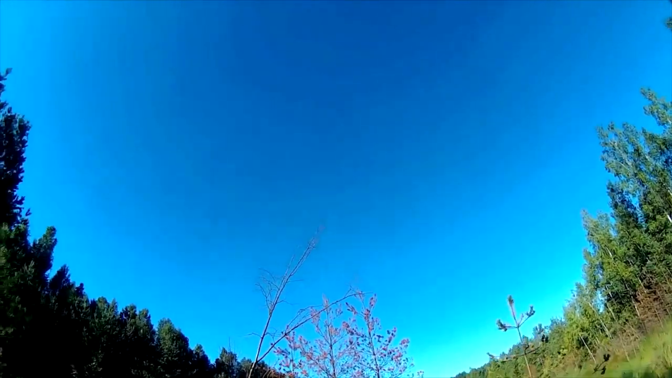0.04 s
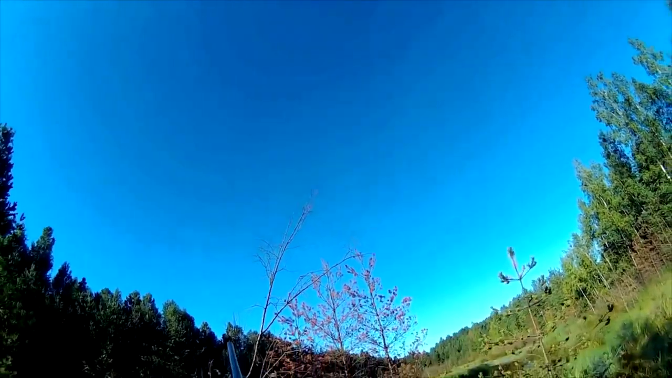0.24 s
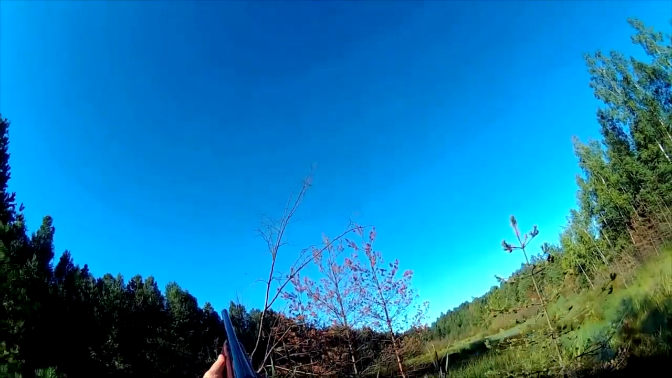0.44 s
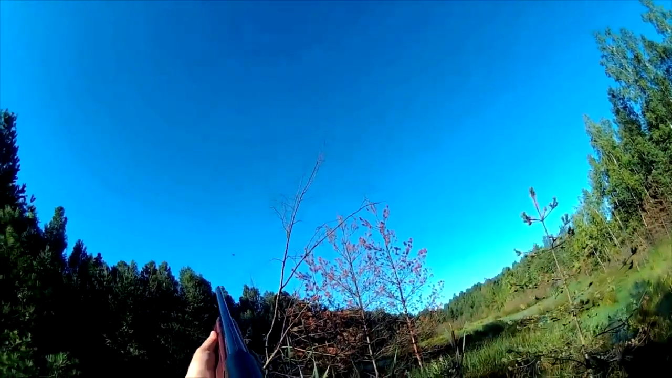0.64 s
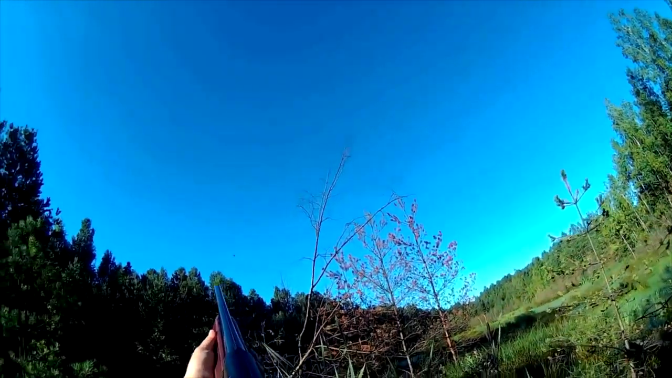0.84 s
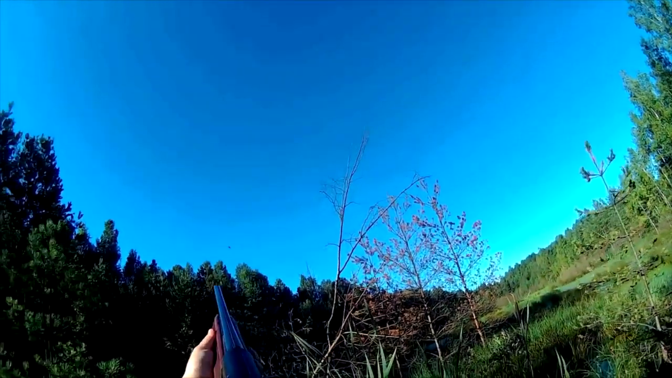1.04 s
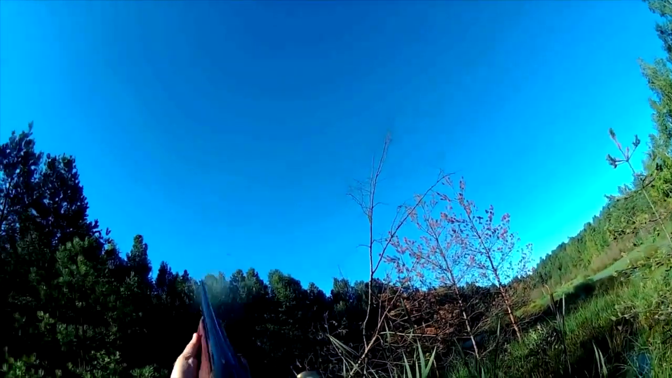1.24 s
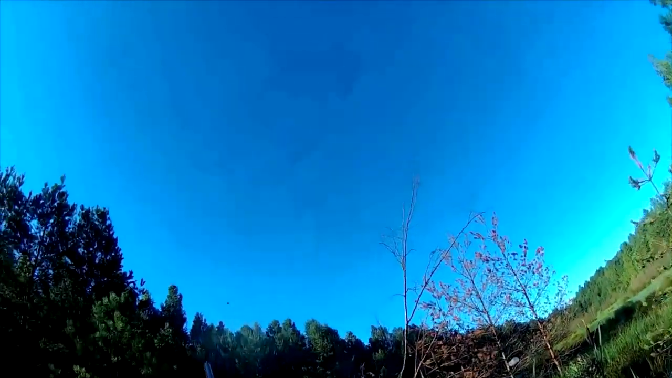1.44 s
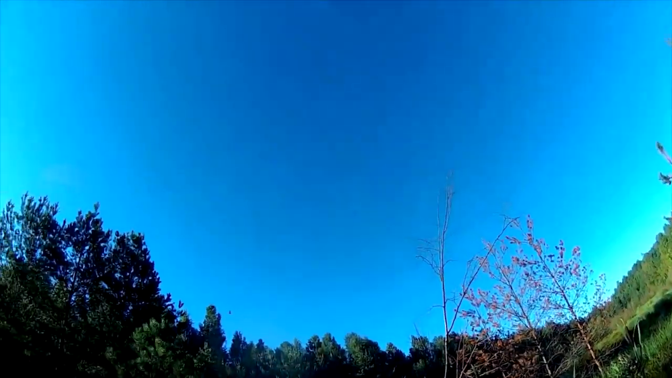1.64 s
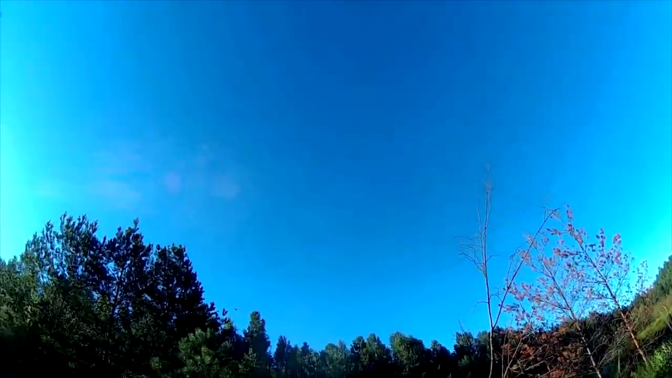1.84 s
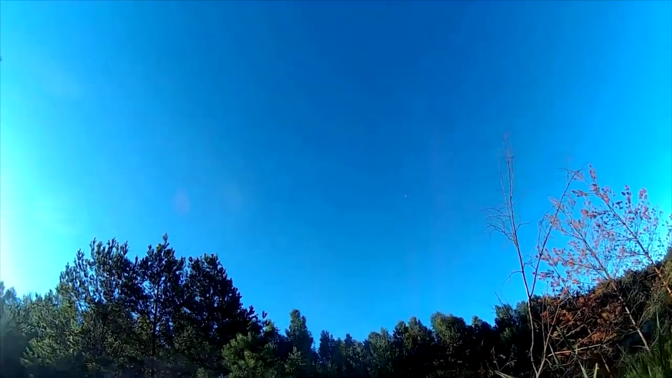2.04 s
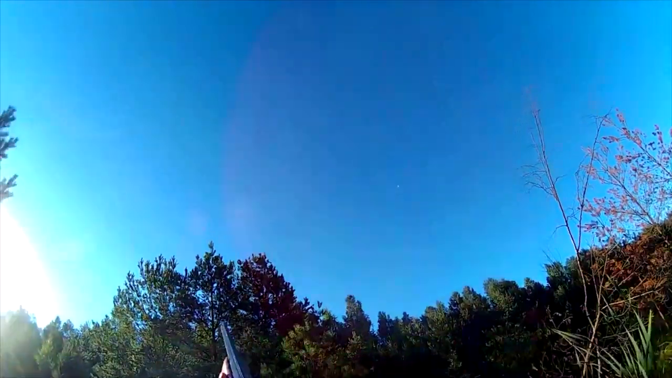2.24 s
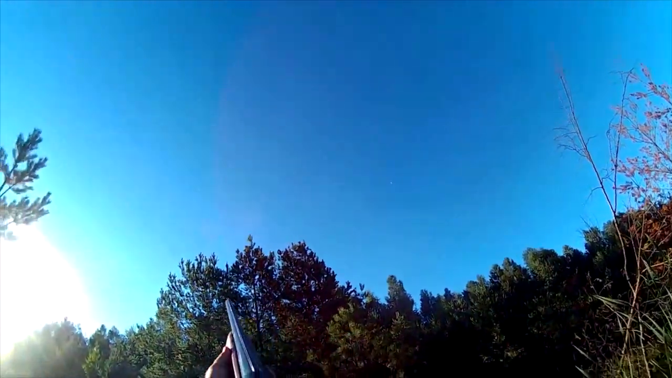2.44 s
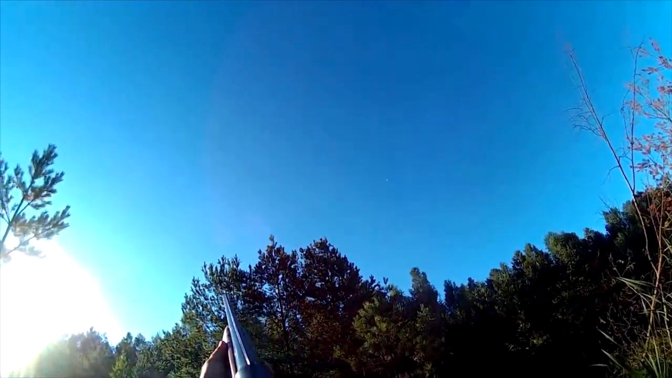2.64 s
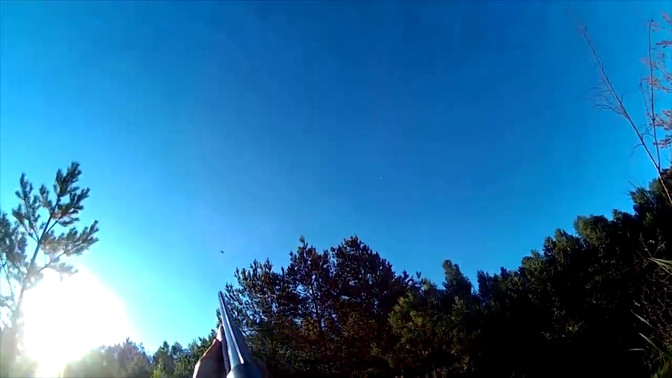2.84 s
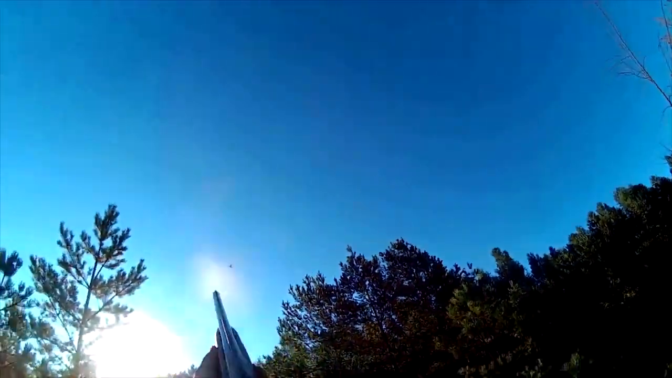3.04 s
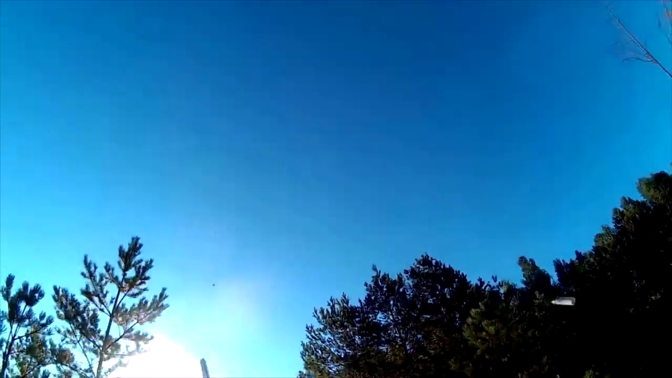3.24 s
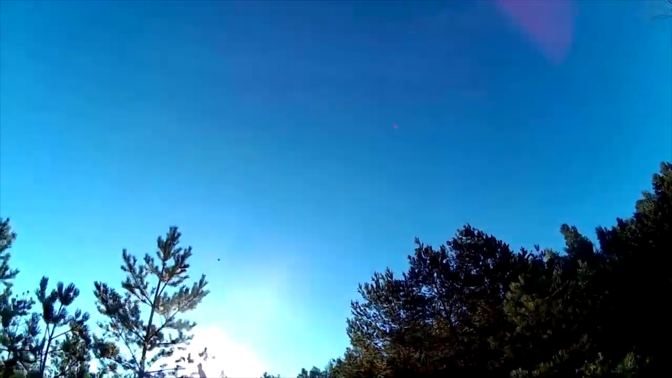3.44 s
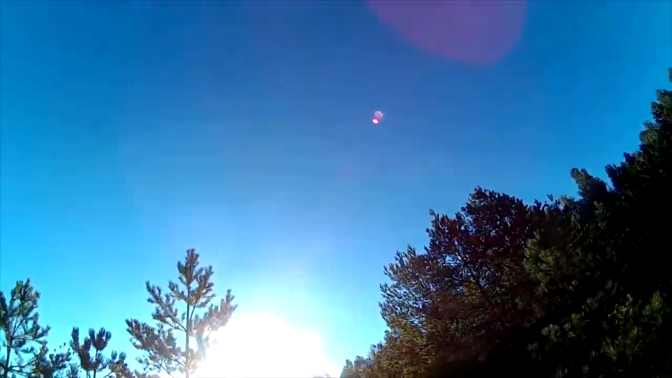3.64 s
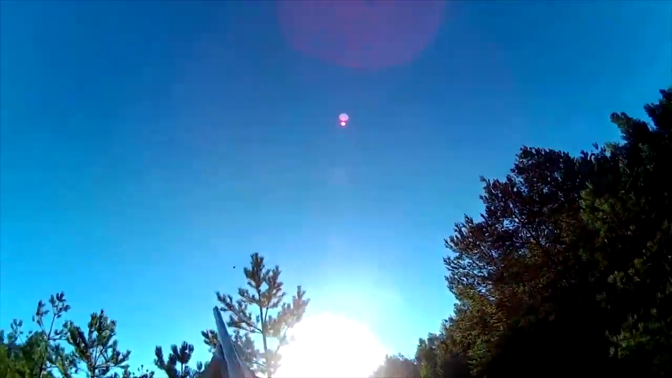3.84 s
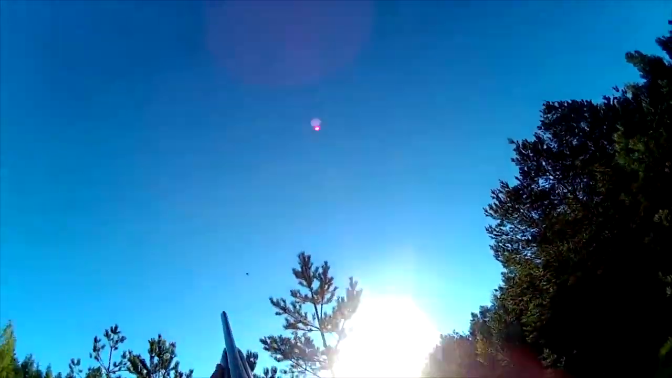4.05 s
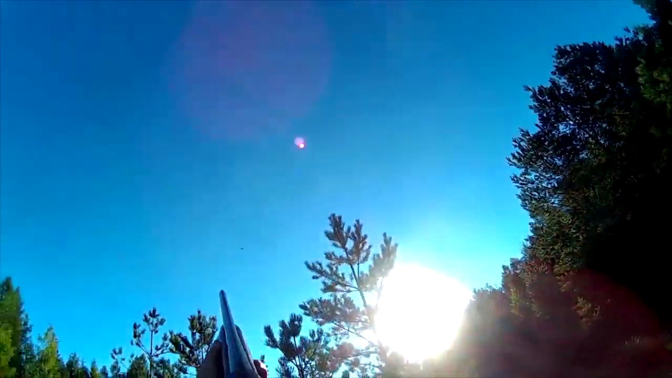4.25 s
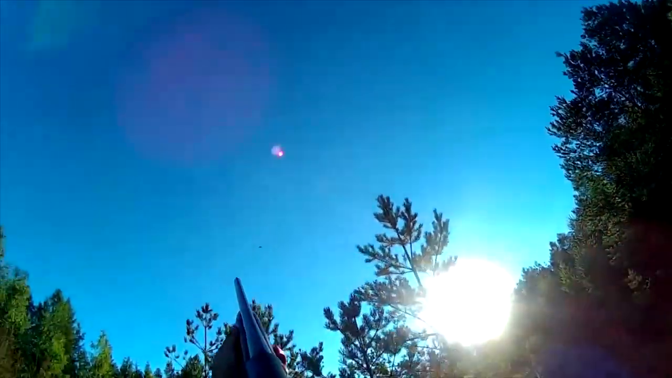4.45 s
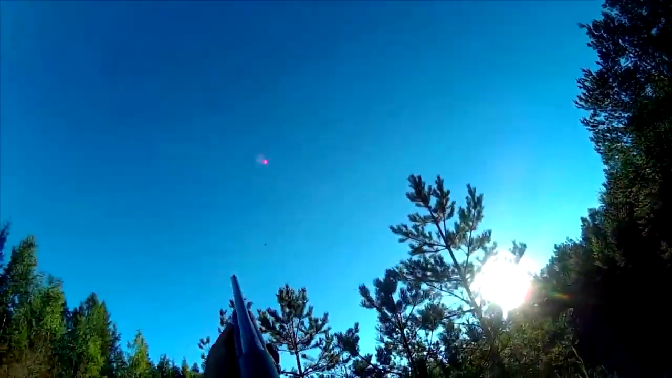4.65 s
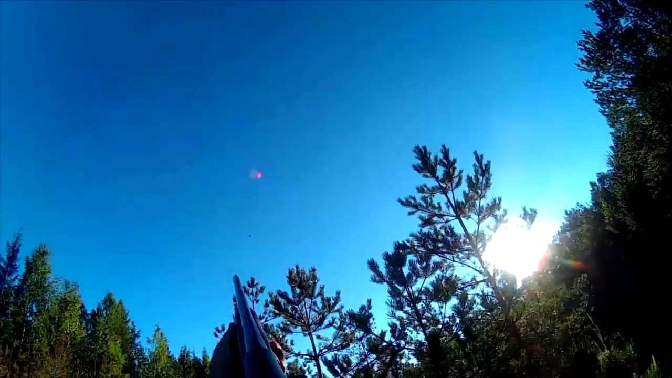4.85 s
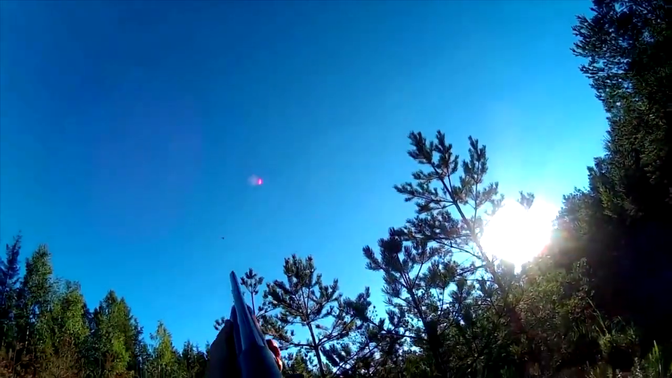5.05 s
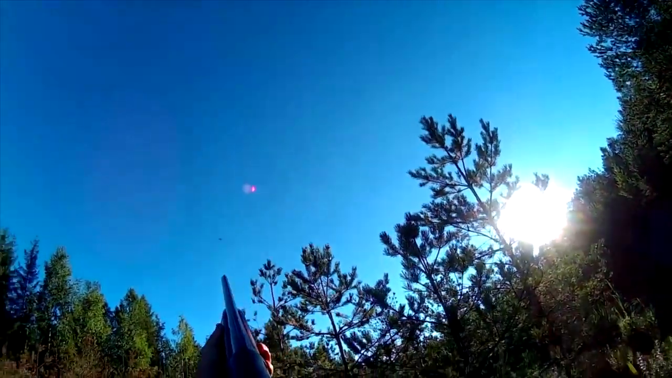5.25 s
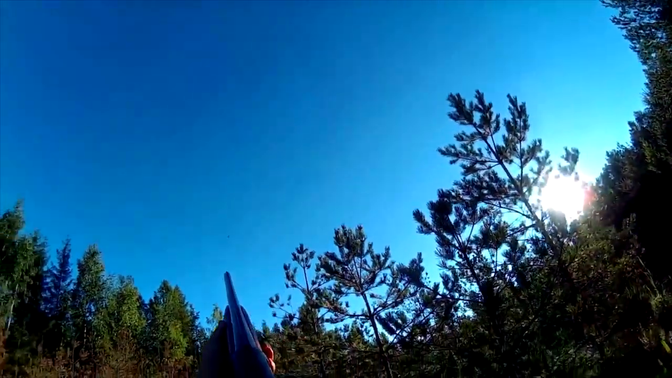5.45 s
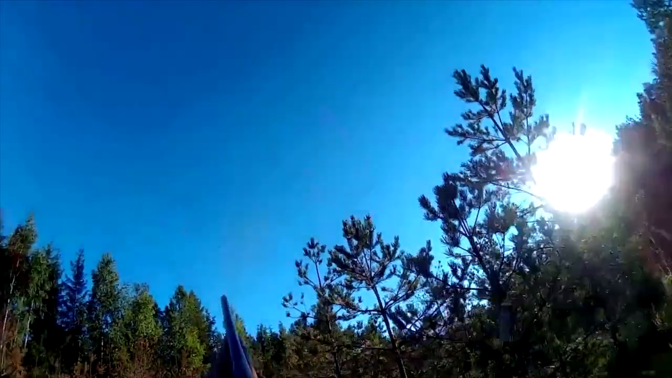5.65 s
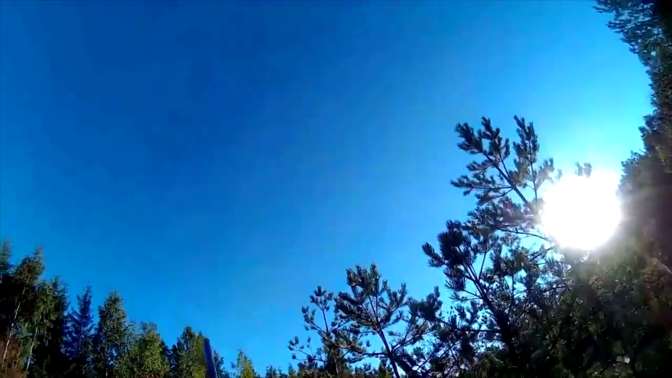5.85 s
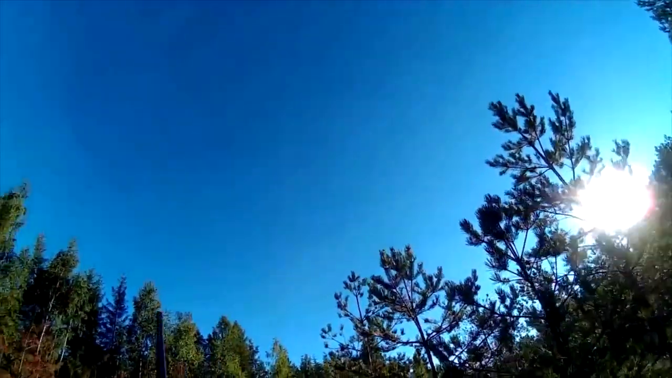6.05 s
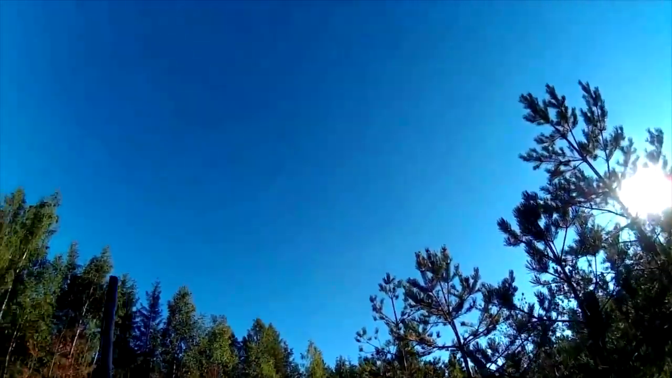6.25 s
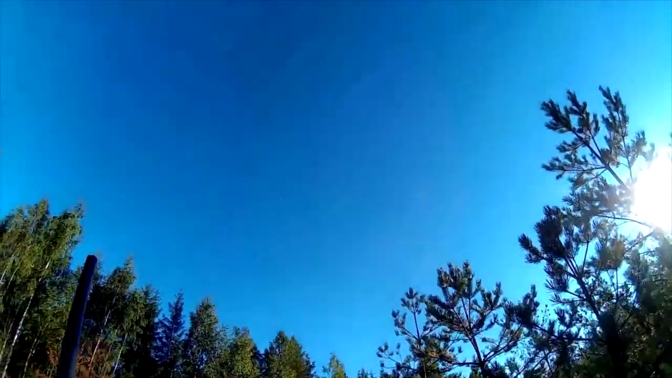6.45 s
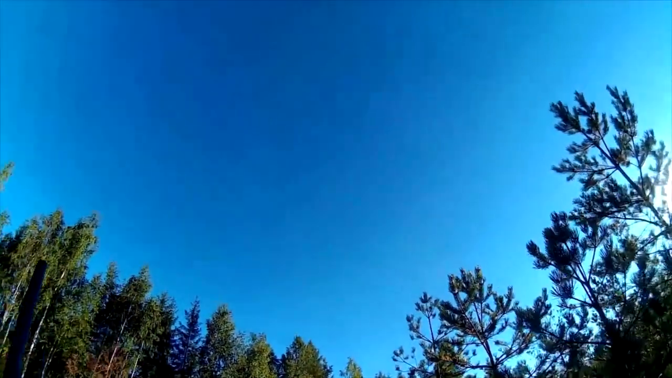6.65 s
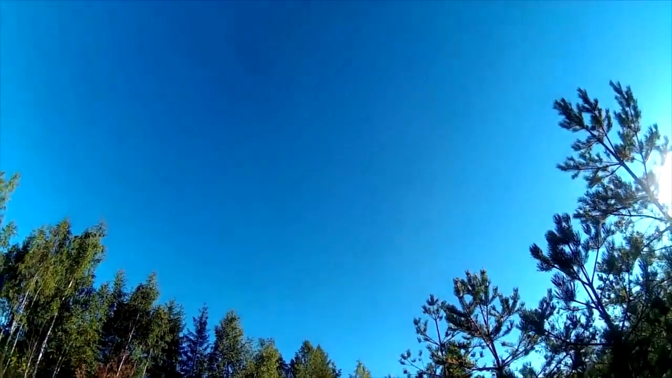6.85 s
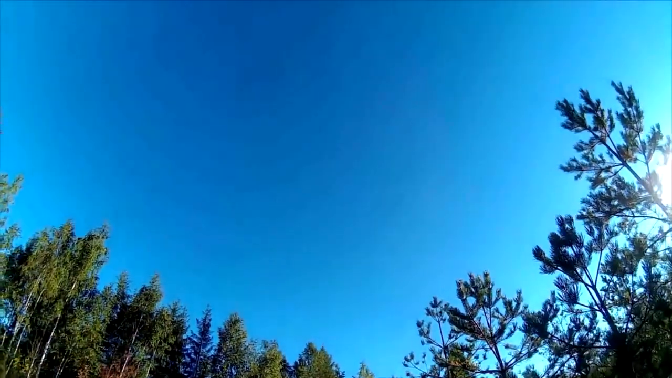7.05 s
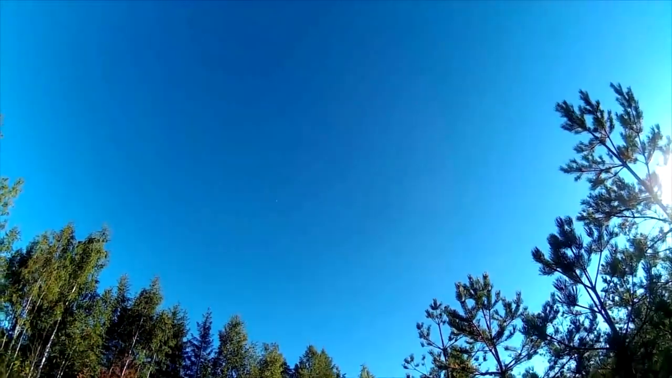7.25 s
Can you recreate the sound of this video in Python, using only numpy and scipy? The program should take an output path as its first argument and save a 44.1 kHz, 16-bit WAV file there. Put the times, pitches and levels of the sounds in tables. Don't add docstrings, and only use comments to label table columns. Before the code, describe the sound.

After wooden gun knocks and scraping cloth, three close shotgun shots distort the microphone, their long dull echoes rumbling back from surrounding trees.

```python
import sys
import numpy as np
from scipy import signal
from scipy.fft import rfft, irfft, next_fast_len
from scipy.io import wavfile

SR = 44100
rng = np.random.default_rng(int(sys.argv[2]) if len(sys.argv) > 2 else 0)


def dump_mix(stems):
    frames = np.atleast_2d(stems).T
    limited = np.clip(frames, -1, 1)
    pcm = np.round(limited * 32767).astype(np.int16)
    wavfile.write(sys.argv[1], SR, pcm)


def undo_db(level):
    steps = np.asarray(level, float) / 20
    return 10 ** steps


N = 322341
PADDED = next_fast_len(N)
HZ = np.maximum(np.fft.rfftfreq(PADDED, 1 / SR), 1)
FULL = .96

# start in seconds, muzzle ring in dB, near echo in dB, its fading in dB per second,
# far echo in dB.
SHOTS = [
    (1.5393, -8, 12.5, 46, -7),
    (3.3469, -6.5, 7.5, 41.5, -9.5),
    (5.8783, -11, 9.5, 44, -8),
]
# frequency in Hz, gain in dB.
OUTPUT_TONE = [(15, -13), (60, -5), (200, 1.05), (1500, 1), (3000, -2), (5000, -6.5), (6400, -14.5),
               (7000, -21), (7150, -43), (7550, -39.5), (7700, -21), (8700, -13), (8800, -13)]


def rms_one(x):
    return x / np.sqrt(np.mean(x ** 2) + 1e-20)


def at_hz(points, hz):
    table_hz, table_db = np.array(points).T
    return np.interp(np.log(hz), np.log(table_hz), table_db)


def drift(rate):
    pole = np.exp(-80 * np.pi * rate / SR)
    white = rng.standard_normal(N // 40 + 2002)
    slow = signal.lfilter([1], [1, -2 * pole, pole * pole], white)[2000:]
    return np.interp(np.arange(N) / 40, np.arange(len(slow)), rms_one(slow))


def coloured(white, spectrum):
    gain = undo_db(at_hz(spectrum, HZ) - at_hz(OUTPUT_TONE, np.minimum(HZ, 6500)))
    return rms_one(irfft(rfft(white, PADDED) * gain, PADDED)[:N])


def slices(noise, gain_db):
    spectrum = rfft(noise, PADDED)
    place = 3 * np.clip(np.log2(HZ / 60), 0, 7)
    total = 0
    for k in range(22):
        band = irfft(spectrum * np.clip(1 - abs(place - k), 0, 1), PADDED)[:N]
        total = total + band * undo_db(gain_db(60 * 2 ** (k / 3)))
    return total


def strokes(rows):
    t, power = np.arange(0, N + 50, 50) / SR, 1e-10
    for s, db, rise, fall in rows:
        spans_away = np.where(t < s, (s - t) / rise, (t - s) / fall)
        power = power + undo_db(2 * db - 40 * spans_away)
    return np.interp(np.arange(N) / SR, t, 10 * np.log10(power))


def add_ring(out, s, db, hz, t60, rise_cycles=.5):
    t = np.arange(round(.08 * SR)) / SR
    part = out[round(s * SR):][:len(t)]
    rise = 1 - np.exp(-(hz * t / rise_cycles) ** 2)
    decay = undo_db(db - 60 * t / max(t60, .001))
    part += (rise * decay * np.sin(2 * np.pi * hz * t))[:len(part)]


def quiet_air():
    # frequency in Hz, density in dB per Hz.
    air_tone = [(18, -45.5), (30, -24), (87, -2.5), (131, -7.5), (271, -8), (467, -4.5), (988, -5.5),
                (1520, -14.5), (6800, -40.5), (8840, -67.5), (15000, -120)]
    return undo_db(-52.5) * coloured(rng.standard_normal(N), air_tone)


def knocks_and_ticks():
    # start in seconds, peak in dB, pitch in Hz, decay t60 in seconds.
    knocks = [(0.074, -31, 649, 0.02), (0.089, -12.5, 1200, 0.018), (0.098, -26, 1410, 0.03),
              (0.164, -27, 1220, 0.021), (0.243, -32, 765, 0.027), (0.251, -9.5, 890, 0.016),
              (0.268, -23, 1260, 0.023), (0.722, -18, 1066, 0.036), (0.782, -11, 557, 0.022),
              (0.793, -15.5, 630, 0.036), (0.815, -15, 1030, 0.009), (0.844, -35, 624, 0.018),
              (0.875, -28, 1610, 0.026), (1.018, -47, 624, 0.02), (1.144, -12, 1140, 0.012),
              (1.476, -37, 720, 0.014), (4.737, -11.5, 827, 0.02), (4.671, -19.5, 1670, 0.036),
              (7.246, -21, 900, 0.023)]
    # start in seconds, peak in dB, pitch in Hz, decay t60 in seconds, duller ring in relative dB.
    tick_rows = [(4.4356, -32.5, 2740, 0.034, 19), (4.621, -30, 2820, 0.03, -5),
                 (4.679, -25, 3530, 0.025, 8), (4.7351, -32, 2930, 0.025, -8),
                 (4.8582, -20.5, 4080, 0.015, 9), (4.9394, -59, 2940, 0.025, 1),
                 (5.0922, -29.5, 3640, 0.025, -12), (5.135, -41, 2630, 0.011, -7),
                 (5.269, -42, 3360, 0.032, 16), (5.295, -39.5, 2790, 0.024, 14),
                 (5.3714, -40, 3800, 0.028, -7), (5.3896, -56, 2680, 0.025, 3),
                 (7.2465, -50, 2700, 0.025, 24)]
    # start in seconds, level in dB, pitch in Hz, decay t60 in seconds.
    thumps = [
        (0.25, -25, 383, 0.016),
        (0.704, -26.5, 506, 0.066),
        (0.784, -38, 470, 0.043),
        (4.856, -25, 463, 0.06),
        (6.877, -25, 206, 0.071),
        (6.959, -24, 307, 0.09),
    ]
    out = np.zeros(N)
    soft = 0.84
    detune = rng.uniform(0.847, 1.11, (len(knocks), 2))
    for (s, db, hz, t60), (low, high) in zip(knocks, detune):
        add_ring(out, s, db - 3.5, hz, t60, soft)
        add_ring(out, s, db - 13, 0.81 * low * hz, 0.91 * t60, soft)
        add_ring(out, s, db - 4.5, 1.3 * high * hz, .5 * t60, soft)
        add_ring(out, s, db - 7.5, 1.166 * low * hz, 0.67 * t60, soft)
        add_ring(out, s + 0.00198, db - 10.5, 0.83 * high * hz, t60, soft)
    ratios = rng.uniform(.85, 1.15, (len(tick_rows), 4))
    for (s, db, hz, t60, dull_db), spread in zip(tick_rows, ratios):
        add_ring(out, s, db - 1.5, hz, 0.88 * t60, 1.5)
        add_ring(out, s, db + dull_db, 1450, .018)
        for ratio in spread:
            add_ring(out, s, db - 8, ratio * hz, .01, 1.5)
    for s, db, hz, t60 in thumps:
        add_ring(out, s, db + 1, hz, t60)
    return out


def grains(per_s, clump_db):
    sizes = undo_db(2.2 * np.minimum(rng.exponential(1, N), 5)) * rng.standard_normal(N)
    chance = per_s * undo_db(clump_db * drift(20)) / SR
    return sizes * (rng.random(N) < chance)


def jacket():
    # peak in seconds, level in dB, rise in seconds, fall in seconds, brightness in dB.
    jacket_strokes = [
        (.2, -50, .5, 0.59, -22.5),
        (.43, -48.5, 0.14, 0.32, -15.5),
        (.57, -34, 0.14, 0.12, -21),
        (.66, -33.5, .15, 0.18, -15.5),
        (.83, -30, 0.16, 0.14, -15.5),
        (.93, -52, .1, 0.3, -2.5),
        (1.07, -44, 0.22, 0.059, -13),
        (1.2, -53, 0.25, 0.18, -12.5),
    ]
    # frequency in Hz, density in dB per Hz.
    cloth_tone = [(80, -44.5), (150, -25), (250, -10.5), (450, -7), (600, -4), (1070, -5), (2000, -5.5),
                  (3300, -14.5), (3770, -11), (4400, -24.5), (5700, -32), (6600, -48), (8800, -42)]
    low_db = strokes([row[:4] for row in jacket_strokes])
    high_db = strokes([(s, db + bright_db, rise, fall) for s, db, rise, fall, bright_db in jacket_strokes])
    hollow_hz = 900 * 2 ** (0.31 * drift(6.7))

    def gain_db(hz):
        bright = np.clip(np.log2(hz / 1500), 0, 1)
        peak_db = 8 * np.exp(-(np.log2(hz / hollow_hz) / .35) ** 2)
        return low_db + bright * (high_db + 12.5 - low_db) + peak_db + 1.8 * drift(15)

    return slices(coloured(grains(per_s=4500., clump_db=2.5), cloth_tone), gain_db)


def gun():
    # start in seconds, level in dB, pitch in Hz, decay t60 in seconds.
    hammer = [
        (1.517, -24, 2230, 0.0051),
        (3.323, -28.5, 2230, 0.0089),
        (5.856, -28.5, 2210, 0.006),
    ]
    out = np.zeros(N)
    for s, db, hz, t60 in hammer:
        add_ring(out, s, db - 4, hz, t60)
        add_ring(out, s, db - 10, 3400, .01)
        add_ring(out, s, db - 8, 1300, .015)
    for s, ring_db, *_ in SHOTS:
        add_ring(out, s - .0045, -23, 1050, .04)
        add_ring(out, s - .004, -33, 350, .02)
        add_ring(out, s - .0035, -42, 3300, .01)
        add_ring(out, s - .003, -30, 1700, .03)
        add_ring(out, s - .0002, ring_db, 2350, .04)
        add_ring(out, s, ring_db - 4, 3300, .03)
        add_ring(out, s, ring_db - 3, 850, .03)
    return out


def roll():
    # peak in seconds, level in dB, rise and fall in seconds.
    ridges = [
        (2.07, -9.5, 0.23, 0.34),
        (3.8, -17.5, 0.22, .3),
        (4.58, -34, 0.38, 0.11),
        (4.84, -30.5, .5, .05),
        (6.42, -17, 0.31, 0.074),
        (6.63, -22.5, 0.13, .3),
        (6.97, -20.5, 0.21, 0.067),
        (7.27, -31.5, 0.36, .3),
    ]
    t, power = np.arange(N) / SR, 1e-18
    hold_s = .05
    for s, _, near_db, near_db_per_s, far_db in SHOTS:
        age = np.maximum(t - s, 0)
        fading_s = np.hypot(age, hold_s) - hold_s
        bush_db = 6 * np.exp(-age / .07)
        near = near_db - near_db_per_s * fading_s + bush_db
        far = far_db - 13.5 * age
        power = power + (age > .002) * (undo_db(2 * near) + undo_db(2 * far))
    return np.sqrt(power + (t > SHOTS[0][0]) * undo_db(2 * strokes(ridges)))


def add_trunk_returns(out):
    # time in seconds, crackle in dB.
    returns = [(2.082, -9), (2.148, -15.5), (3.793, -17), (3.827, -16), (3.8553, -24), (3.8802, -8.5),
               (6.338, -4), (6.3483, -21), (6.3737, -19.5), (6.3784, -11), (6.3857, -13.5), (6.4114, -18),
               (6.417, -20.5), (6.4333, -15), (6.4863, -14.5)]
    t = np.arange(N) / SR
    for k, (s, db) in enumerate(returns):
        near = slice(round(s * SR) - 150, round(s * SR) + 200)
        since = t[near] - s - .0004
        shape = np.exp(-(since / .0008) ** 4)
        height = (-1) ** k * FULL * (1.01 + min(undo_db(db) ** 2, .1))
        wavefront = height * np.cos(2 * np.pi * 900 * since)
        out[near] += shape * (wavefront - out[near])


def echo():
    # frequency in Hz, density in dB per Hz.
    echo_tone = [(35, -69.5), (60, -46), (182, -22.5), (265, -16), (461, -7), (551, -5.5), (658, -1.5),
                 (712, -2), (1080, -1), (2430, -20), (3760, -35.5), (5400, -50), (6800, -65), (8840, -93),
                 (15000, -120)]
    # frequency in Hz, extra gain in dB per unit of path.
    air_loss = [(100, 10), (800, 1), (1500, -7), (2500, -13.5), (4000, -25.5), (5500, -38.5), (7000, -48)]
    dense_until_s = [
        2.072,
        3.785,
        6.33,
    ]
    t = np.arange(N) / SR
    age, late = np.zeros(N), np.zeros(N, bool)
    for (s, *_), dense in zip(SHOTS, dense_until_s):
        age = np.where(t >= s, t - s, age)
        late = np.where(t >= s, t > dense, late)
    path = np.maximum(age, .3) ** .5 - .84
    together = drift(7.6)
    near_db = 5 * np.exp(-age / .09)
    gaps_db = 5 * np.exp(-age / .25) * drift(25)

    def gain_db(hz):
        bright = np.clip(np.log2(hz / 800), -1, 1.3)
        return at_hz(air_loss, hz) * path + near_db * bright + gaps_db + 1.1 * together + .9 * drift(9)

    out = roll() * slices(coloured(rng.standard_normal(N), echo_tone), gain_db)
    limited = out / (1 + (out / (.95 * FULL)) ** 8) ** (1 / 8)
    out = np.where(late, limited, out)
    add_trunk_returns(out)
    return out


def sleeve():
    # peak in seconds, level in dB, rise in seconds, fall in seconds.
    sleeve_strokes = [
        (2.35, -57.5, .2, .6),
        (4.1, -51.5, .3, .4),
        (4.5, -56.5, .5, .4),
        (4.66, -44, 0.098, 0.51),
        (4.78, -59, .15, .15),
        (5.02, -68, 0.48, 0.18),
        (5.3, -59, .15, 0.17),
        (6.81, -53, .35, 0.15),
        (6.98, -63, 0.18, 0.2),
        (7.28, -78, .4, .4),
    ]
    # frequency in Hz, density in dB per Hz.
    sleeve_tone = [(150, -31.5), (500, -12), (1500, -1), (3000, -2.5), (3800, 2.5), (4400, -7), (6000, -25),
                   (8800, -36.5)]
    level_db = strokes(sleeve_strokes) + 6.5
    return undo_db(level_db) * coloured(grains(per_s=6000., clump_db=2.0), sleeve_tone)


def scene():
    cloth = jacket() + sleeve()
    return (quiet_air() + knocks_and_ticks() + cloth + gun() + echo())[None]


def overload(x):
    limit, plateau = 1.05, .135
    held = np.clip(x, -limit, limit)
    return held - (limit - plateau) * np.sign(held) * (abs(held) > FULL)


def smear_top(spectrum):
    grid_hz = np.arange(0, SR / 2, 45)
    delay_s = .024 * np.interp(HZ, grid_hz, rng.uniform(-.25, 1.4, len(grid_hz)))
    top = HZ > 7350
    late = np.exp(-2j * np.pi * np.cumsum(delay_s * top) * SR / PADDED)
    sharp = 0.84
    return spectrum * np.where(top, sharp + np.sqrt(1 - sharp ** 2) * late, 1)


def copy_top(spectrum):
    # frequency in Hz, level in dB relative to the band copied.
    copy_tone = [(8830, -35), (12700, -23.5), (12800, -17), (15000, -13.5)]
    edge = np.clip((8830 - HZ) / 60 + .5, 0, 1)
    shift = round(3900 * PADDED / SR)
    spectrum = spectrum * edge
    band = spectrum * np.roll(1 - edge, -shift)
    for _ in range(2):
        band = np.roll(band, shift) * undo_db(at_hz(copy_tone, HZ)) * (HZ < 15100)
        spectrum += band
    return spectrum


def roll_off(x):
    return signal.sosfilt(signal.butter(12, 15700, fs=SR, output="sos"), x)


def record(dry):
    spectrum = rfft(overload(dry[0]), PADDED)
    spectrum = spectrum * undo_db(np.minimum(at_hz(OUTPUT_TONE, HZ), 0))
    spectrum = copy_top(smear_top(spectrum))
    return roll_off(irfft(spectrum, PADDED)[None, :N])


dry = scene()
out = record(dry)
dump_mix(out)
```